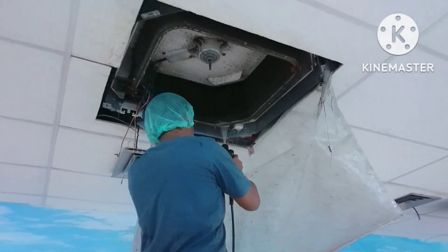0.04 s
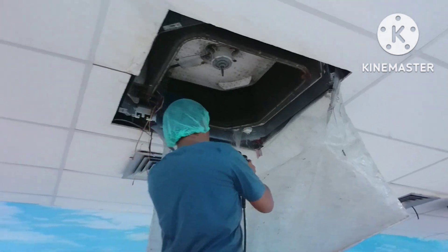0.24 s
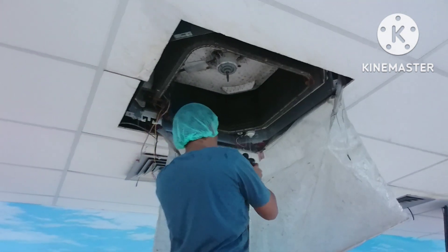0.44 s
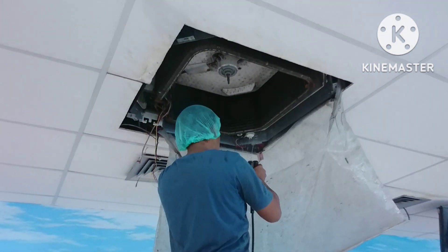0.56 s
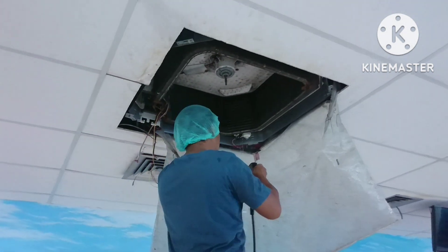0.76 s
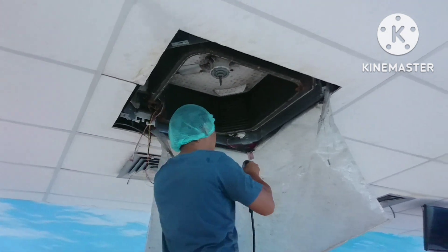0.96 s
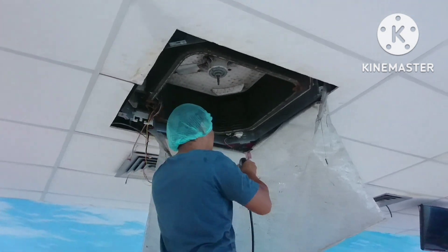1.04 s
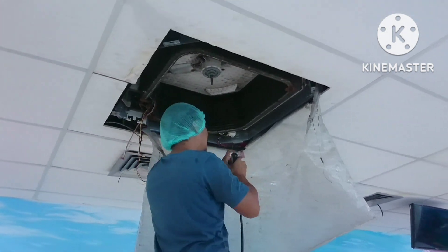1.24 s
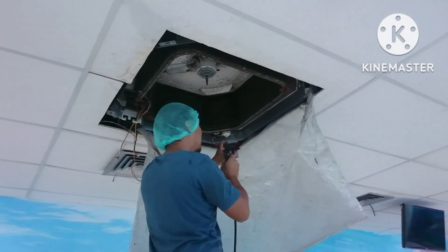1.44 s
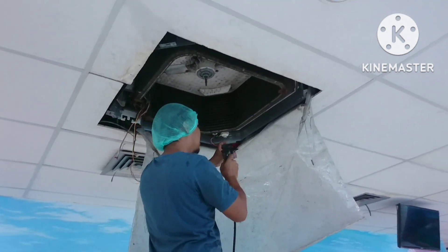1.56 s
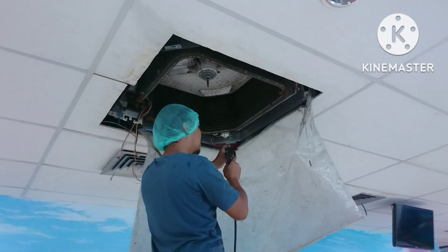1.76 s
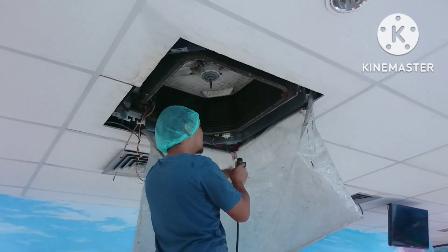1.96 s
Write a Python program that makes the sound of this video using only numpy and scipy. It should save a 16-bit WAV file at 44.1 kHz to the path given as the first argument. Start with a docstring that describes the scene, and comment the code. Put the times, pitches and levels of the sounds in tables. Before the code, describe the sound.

A pressure washer drones and hisses against a ceiling air conditioner, stops, then bursts back on

```python
"""A pressure washer cleans a ceiling air conditioner in a hard-walled room.
Its three-piston pump drones, stops and starts again: a stack of shaft orders over a mains hum.
The jet, in shaped noise, hisses on the coil in surges and drums on the casing; metal parts ring as resonances.
In the pause come clacks, a few soft knocks and a spit of water, as decaying bursts of noise.
A low room rumble and air noise lie under everything."""
import sys
import numpy as np
from scipy import signal
from scipy.fft import rfft, irfft, next_fast_len
from scipy.io import wavfile
from scipy.ndimage import map_coordinates

SR = 44100
rng = np.random.default_rng(int(sys.argv[2]) if len(sys.argv) > 2 else 0)


def transcribe(signal):
    """Save signal, clipped to [-1, 1], as a 16-bit WAV file at the path in sys.argv[1]."""
    frames = np.atleast_2d(signal).T
    limited = np.clip(frames, -1, 1)
    pcm = np.round(limited * 32767).astype(np.int16)
    wavfile.write(sys.argv[1], SR, pcm)


N = 88464
PISTONS = 3
REAIM_S = 1.4  # the jet is aimed elsewhere from here on

# Pump shaft speed: (time [s], speed [turns per second])
SHAFT_SPEED = [(0, 48.33), (.8, 48.33), (1.44, 36), (1.56, 43), (1.64, 45.5), (2.0, 45.7)]
# Jet on the coil: (time [s], level [dB])
JET_LEVEL = [(0, -25.5), (.39, -25.5), (.44, -31), (.49, -32), (.515, -28.5), (.6, -29), (.72, -37),
             (.93, -53.5), (1.15, -57.5), (1.25, -67.5), (1.42, -66), (1.53, -50.5), (1.6, -40),
             (1.69, -39), (1.705, -28.5), (1.78, -29.5), (1.87, -33.5), (2.0, -51)]
# Colour of water drumming on the casing: (frequency [Hz], relative density [dB per Hz])
CASING_COLOUR = [(25, -55), (50, -16), (100, -9), (150, -9), (240, -14.5), (330, 0.5), (440, 2),
                 (570, -2.5), (720, -1.5), (1050, -1), (1230, -14.5), (1450, -9.5), (2400, -15.5),
                 (4000, -15.5), (7000, -44), (12000, -70)]
# Colour of the low room rumble: (frequency [Hz], relative density [dB per Hz])
RUMBLE_COLOUR = [(20, -50), (34, -26), (48, -14), (62, 5.5), (78, -4.5), (98, -9.5), (115, -16), (135, -23),
                 (300, -43), (600, -81)]
# Stereo width: (frequency [Hz], left-right likeness [0 to 1])
LIKENESS = [(60, 0.99), (150, 0.93), (380, 0.87), (950, 0.43), (2380, 0.082), (5980, 0.049), (15000, 0.065)]


def amp(db):
    """Decibels to gain."""
    return 10 ** (np.asarray(db) / 20)


def unit(x):
    """Scale to rms 1."""
    return x / np.sqrt(np.mean(x ** 2) + 1e-20)


def along(points, hz):
    """Read (Hz, value) points on a log frequency axis."""
    f, v = np.transpose(points)
    return np.interp(np.log(hz + 1), np.log(f + 1), v)


def curve(rows):
    """Turn (s, value) points into one value per sample."""
    return np.interp(np.arange(N) / SR, *np.transpose(rows))


def wobble(rate):
    """A smooth random curve with rate knots a second."""
    knots = rng.standard_normal(int(N * rate / SR) + 4)
    return map_coordinates(knots, [np.arange(N) * rate / SR])


def filtered(x, response):
    """Multiply the spectrum of x by a response of frequency."""
    m = next_fast_len(N + SR // 2)
    return irfft(rfft(x, m) * response(np.fft.rfftfreq(m, 1 / SR)), m)[..., :N]


def apart_angle(hz):
    """The phase angle whose cosine is the left-right likeness."""
    return np.arccos(np.clip(along(LIKENESS, hz), -1, 1))


def spread(pair):
    """Mix two unrelated signals to left and right, alike in the bass."""
    def mid_side_gains(hz):
        turn = apart_angle(hz) / 2
        return np.array([np.cos(turn), np.sin(turn)])
    mid, side = filtered(pair, mid_side_gains)
    return np.array([mid + side, mid - side])


def walls(x, count=16):
    """Early echoes from walls and ceiling ripple the spectrum."""
    echo_gain, longest_s = 0.16, .04
    out = x.copy()
    delays = rng.uniform(.003, longest_s, count)
    gains = echo_gain * rng.choice([-1, 1], count)
    for delay, gain in zip(delays, gains):
        out += gain * np.roll(x, round(delay * SR), axis=-1)
    return out


def rush(colour, grain_db=0):
    """Coloured stereo noise of rms 1; grain_db scatters the sizes of its drops."""
    drops = rng.standard_normal((2, N)) * amp(grain_db * wobble(1000))
    coloured = filtered(walls(drops), lambda hz: amp(along(colour, hz)))
    return unit(spread(coloured))


def ringing(modes, dull_hz):
    """Stereo noise of rms 1 in a body's resonances, dull above dull_hz."""
    def body(f):
        response = sum(amp(db) * 1j * f * width / (centre * centre - f * f + 1j * f * width)
                       for centre, width, db in modes)
        return response / (1 + (f / dull_hz) ** 4)
    return unit(spread(filtered(rng.standard_normal((2, N)), body)))


def burst(start, rise, t60):
    """An envelope that rises linearly, then falls 60 dB in each t60 seconds."""
    t = np.maximum(np.arange(N) / SR - start, 0)
    return np.minimum(t / rise, 1) * amp(-60 * np.maximum(t - rise, 0) / t60)


def room(x):
    """The room's tail: decaying noise in which each frequency dies at its own speed."""
    # Room decay: (frequency [Hz], T60 [s])
    decay_t60 = [(200, 0.51), (2000, 1.6), (6000, 0.96), (12000, 0.55)]
    hz, t, z = signal.stft(rng.standard_normal((2, SR)), SR, nperseg=256)
    fade = amp(-60 * t / along(decay_t60, hz)[:, None])
    tail = signal.istft(z * fade, SR, nperseg=256)[1]
    tail = tail / np.linalg.norm(tail[0])
    return spread(signal.fftconvolve(x.mean(0)[None], tail, axes=1)[:, :N])


def pump(angle, waver=0.059, flutter_db=1.4, count=70):
    """Shaft orders, phased as three piston strokes a turn, each wavering a little, plus room tail."""
    # Direct drone: (time [s], level [dB])
    drone_level = [(0, -25.5), (.1, -23), (.25, -22.5), (.41, -22.5), (.47, -32.5), (.58, -35.5), (.7, -45),
                   (.8, -55), (1.43, -87), (1.5, -50), (1.61, -42), (1.73, -35), (1.83, -48), (2.0, -43)]
    # Strong shaft orders: (multiple of shaft speed, relative level [dB])
    strong_orders = [(4, -15), (9, -9), (12, -9), (14, -7), (15, 3.2), (16, 6), (17, 1), (18, -5), (19, 1),
                     (20, -5), (22, -13), (23, -12), (29, -5), (30, -6), (33, -8.5), (35, -11), (36, -7),
                     (37, -5), (38, -7.5), (39, -10), (41, -12), (43, -13)]
    # All other orders: (frequency [Hz], relative level [dB])
    weak_orders = [(48, -32), (150, -24.5), (350, -19.5), (600, -14), (1250, -30.5), (1900, -35),
                   (2400, -30), (3400, -28)]
    strong = {round(k): db for k, db in strong_orders}
    shaft_hz, out = SHAFT_SPEED[0][1], np.zeros((2, N))
    uneven = .15 * rng.standard_normal(count)  # fixed phase offsets [rad]
    for k in range(1, count):
        db = strong.get(k, along(weak_orders, k * shaft_hz))
        apart = apart_angle(k * shaft_hz) * rng.choice([-1, 1])
        phase = k * angle + 2 * np.pi * k * k / PISTONS + uneven[k] + waver * wobble(14.1)
        out += amp(db + flutter_db * wobble(11.2)) * np.cos(phase + apart * np.array([[1], [0]]))
    drone = unit(out) * amp(curve(drone_level))
    return drone + amp(-17.5) * room(drone)


def motor(waver_db=2):
    """Motor hum: mains lines, slightly unsteady in phase and level."""
    # Hum: (time [s], level before its waver [dB])
    hum_level = [(0, -45.5), (.12, -49), (.48, -43), (.62, -47), (.8, -77), (1.5, -64), (1.68, -42.5),
                 (1.77, -43.5), (1.86, -65), (2.0, -61)]
    # Mains lines: (frequency [Hz], relative level [dB])
    mains_lines = [(100, -19), (200, 1), (300, -12)]
    t = np.arange(N) / SR
    lines = sum(amp(db) * np.sin(2 * np.pi * hz * t + 0.57 * wobble(6.4)) for hz, db in mains_lines)
    return unit(lines) * amp(curve(hum_level) + waver_db * wobble(14.2))


def spray(angle, throb_db=-0.53, flicker_db=0.55):
    """All the jet's sounds share one throb with the piston strokes and a slight random flicker."""
    throb = amp(throb_db * np.cos(PISTONS * angle) + flicker_db * wobble(70))
    return throb * (hiss() + mist() + splatter() + drumming() + tray() + slaps() + spurt())


def hiss():
    """Turbulent water on the coil: broad noise and the coil's ringing surge together."""
    # Hiss colour: (frequency [Hz], relative density [dB per Hz])
    hiss_colour = [(30, -35), (300, -9), (900, -6.5), (1900, -1.5), (2900, -2), (3600, -2.5), (3980, 5),
                   (4400, -3.5), (5100, -3), (5700, -7), (6200, -13.5), (7000, -14.5), (8000, -7.5),
                   (9100, -12), (10000, -30), (12000, -36), (15000, -31)]
    # How much further left it sits: (before re-aiming [dB], after [dB])
    left_shift = (2, 0)
    left_db = np.where(np.arange(N) / SR < REAIM_S, *left_shift)
    level_db = curve(JET_LEVEL) + left_db * np.array([[.5], [-.5]])
    return amp(level_db) * (rush(hiss_colour) + coil())


def coil():
    """The coil rings under the jet, with other notes at the second spot."""
    # Modes at the first spot hit: (frequency [Hz], width [Hz], relative level [dB])
    first_modes = [(3430, 21, -5), (3980, 170, -3.5), (4730, 70, -1), (5480, 120, 1)]
    # Modes at the second spot: (frequency [Hz], width [Hz], relative level [dB])
    second_modes = [(3330, 55, -2), (4140, 160, -2), (5270, 55, -6), (5610, 56, 6.5)]
    # both gains are relative to the hiss
    first = amp(-8.5) * ringing(first_modes, dull_hz=6960)
    second = amp(-4.5) * ringing(second_modes, dull_hz=7000)
    return np.where(np.arange(N) / SR < REAIM_S, first, second)


def mist():
    """Fine mist: a treble spray whose level moves more steeply than the jet's."""
    # Mist colour: (frequency [Hz], relative density [dB per Hz])
    mist_colour = [(6000, -12), (9500, -1.5), (12000, -10.5), (13500, -2), (15200, 3)]
    below_jet_db, growth = -8, 2.15  # offset at the jet's peak; mist dB per jet dB
    jet_db = curve(JET_LEVEL)
    mist_db = jet_db.max() + below_jet_db + growth * (jet_db - jet_db.max())
    return amp(mist_db) * rush(mist_colour, grain_db=-2.0)


def splatter():
    """Scattered water: grainy noise with drops of uneven size."""
    # Splatter: (time [s], level [dB])
    splatter_level = [(0, -36), (.4, -31), (.55, -31), (.75, -40.5), (1.25, -52.5), (1.43, -63),
                      (1.47, -46.5), (1.56, -44), (1.595, -26.5), (1.72, -29), (1.8, -31.5), (1.89, -35),
                      (1.95, -33), (2.0, -34)]
    # Splatter colour: (frequency [Hz], relative density [dB per Hz])
    splatter_colour = [(30, -58), (300, -34), (600, -1), (950, 0.5), (1250, -7.5), (1430, -3), (1600, -7),
                       (1900, 0), (2500, -5), (3000, -8), (3900, -10.5), (4600, -18), (5500, -12.5),
                       (6400, -39), (8500, -34), (11000, -48), (15000, -39)]
    return amp(curve(splatter_level)) * rush(splatter_colour, grain_db=2.0)


def drumming():
    """Water drums on the casing: grainy noise in the casing's colour, with a little rumble."""
    # Drumming: (time [s], level [dB])
    drum_level = [(0, -28.5), (.2, -31.5), (.4, -29), (.48, -32), (.54, -30.5), (.62, -39), (.75, -42.5),
                  (.95, -50), (1.25, -69), (1.435, -47), (1.465, -30.5), (1.52, -32.5), (1.6, -28.5),
                  (1.7, -34.5), (1.8, -40), (1.88, -43.5), (1.96, -41.5), (2.0, -61)]
    rumble = amp(-22.5) * rush(RUMBLE_COLOUR)
    return amp(curve(drum_level)) * (rush(CASING_COLOUR, grain_db=2.0) + rumble)


def tray():
    """After re-aiming, water also drums on the drain tray and excites its resonances."""
    # Tray: (time [s], level [dB])
    tray_level = [(1.44, -62), (1.54, -46), (1.61, -30.5), (1.66, -33), (1.72, -32), (1.8, -34.5),
                  (1.86, -41), (1.95, -38.5), (2.0, -39)]
    # Tray modes: (frequency [Hz], width [Hz], relative level [dB])
    tray_modes = [(675, 52, 4.5), (760, 40, -1.5), (986, 32, -0.5), (1070, 38, 5), (1443, 94, -0.5),
                  (1844, 68, 1.5), (2910, 43, -19)]
    return amp(curve(tray_level)) * ringing(tray_modes, dull_hz=3460)


def slaps():
    """Single heavy slaps of water on the casing: short bursts of very grainy noise."""
    # Slaps: (time [s], level [dB])
    slap_times = [(0.33, -28), (0.394, -30), (1.477, -34), (1.591, -33), (1.699, -28)]
    envelope = sum(amp(db) * burst(s, rise=.001, t60=0.024) for s, db in slap_times)
    return envelope * rush(CASING_COLOUR, grain_db=5.5)


def spurt():
    """The jet spurts as pressure returns: one burst of bright noise."""
    # Spurt colour: (frequency [Hz], relative density [dB per Hz])
    spurt_colour = [(1500, -18), (3200, -18), (4200, 9), (4750, 11), (5200, -29), (7000, -18), (15000, -41)]
    return amp(-42.5) * burst(1.443, rise=0.021, t60=0.23) * rush(spurt_colour, grain_db=3.5)


def handling():
    """Clacks and soft knocks with the room's answer, and a dry spit of water."""
    clack, knock = clacks(), knocks()
    return clack + amp(-3.5) * room(clack) + knock + amp(-9.0) * room(knock) + spit()


def clacks(rise_s=0.0044):
    """Hard clacks: bursts of noise, each leaving a thin metallic ring."""
    # Clacks: (time [s], level [dB], level of the ring [dB])
    clack_times = [(.795, -27.5, -42), (.853, -50, -45.5)]
    # Clack colour: (frequency [Hz], relative density [dB per Hz])
    clack_colour = [(30, -45), (150, -11), (400, -8), (850, -0.5), (1100, -3.5), (1450, -2), (1700, -5.5),
                    (2100, 1), (2500, -3.5), (3000, -11.5), (3850, -6), (4600, -27), (5150, -19),
                    (5450, -9.5), (6300, -33), (8500, -36), (12000, -52)]
    # Metallic ring: (frequency [Hz], width [Hz], relative level [dB])
    ring_modes = [(5446, 65, 0)]
    hit = sum(amp(db) * burst(s, rise_s, t60=0.32) for s, db, _ in clack_times)
    ring = sum(amp(db) * burst(s, rise_s, t60=0.36) for s, _, db in clack_times)
    return hit * rush(clack_colour, grain_db=1.5) + ring * ringing(ring_modes, dull_hz=8000)


def knocks(fall_db=10.5):
    """Soft blows on the casing; where each lands decides which modes ring most."""
    # Knocks: (time [s], level [dB], pitch excited most [Hz])
    knock_times = [(1.046, -37, 590), (1.086, -39.5, 1000), (1.165, -55, 1000), (1.215, -52, 600),
                   (1.298, -41, 436)]
    # Casing modes: (frequency [Hz], width [Hz], relative level before the fall-off [dB])
    panel_modes = [(452, 26, 3), (593, 18, 1.5), (702, 22, -1.5), (1010, 81, -0.5), (1410, 42, 2)]
    out = np.zeros((2, N))
    for s, db, main_hz in knock_times:
        # modes lose fall_db per octave away from the main pitch
        modes = [(hz, width, level - fall_db * abs(np.log2(hz / main_hz)))
                 for hz, width, level in panel_modes]
        # soft contact makes the knock dull
        out += amp(db) * burst(s, rise=0.011, t60=0.19) * ringing(modes, dull_hz=2500)
    return out


def spit():
    """A short spit of water in the pause: one burst of grainy noise."""
    # Spit colour: (frequency [Hz], relative density [dB per Hz])
    spit_colour = [(30, -50), (500, -19), (1000, 7.5), (2100, 6), (2900, -14), (4000, -4), (4800, -20),
                   (5600, -3.5), (6300, -15), (7000, -29), (9000, -28), (12000, -54)]
    return amp(-42) * burst(1.349, rise=0.0075, t60=0.29) * rush(spit_colour, grain_db=3.0)


def background():
    """Steady room rumble and air, both coloured noise."""
    # Air colour: (frequency [Hz], relative density [dB per Hz])
    air_colour = [(25, -42), (100, 2), (250, -6.5), (450, 1), (1000, -9.5), (2200, -8), (3000, -18.5),
                  (4500, -26.5), (5500, -19.5), (6500, -44), (9000, -46), (11000, -66)]
    return amp(-48) * rush(RUMBLE_COLOUR) + amp(-47) * rush(air_colour)


def scene():
    """Pump, motor, spray and handling over the background; one shaft angle drives pump and spray."""
    angle = 2 * np.pi * np.cumsum(curve(SHAFT_SPEED)) / SR
    return pump(angle) + motor() + spray(angle) + handling() + background()


def record(dry):
    """Lean the stereo image so the right side is louder, and keep nothing above the band limit."""
    # Stereo lean: (frequency [Hz], left minus right gain [dB])
    lean_db = [(60, -14), (110, -15.5), (200, -14.5), (380, -8), (600, -7.5), (780, -6.5), (1000, -8),
               (1400, -14), (2380, -14.5), (4200, -12.5), (5600, -10), (8120, -1), (15000, -5)]
    top_hz = 15600

    def side_gains(hz):
        left = amp(along(lean_db, hz))
        return 2 * np.array([left, np.ones_like(left)]) / (1 + left) * (hz < top_hz)
    return filtered(dry, side_gains)


dry = scene()
out = record(dry)
transcribe(out)
```